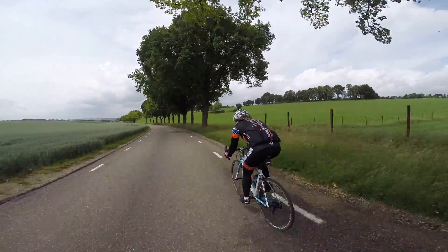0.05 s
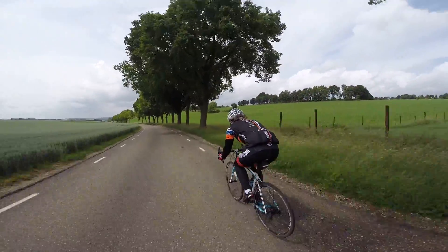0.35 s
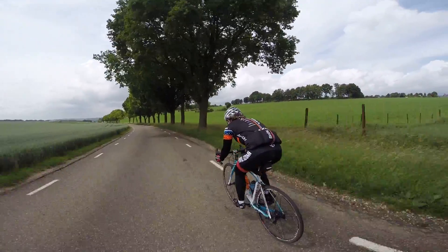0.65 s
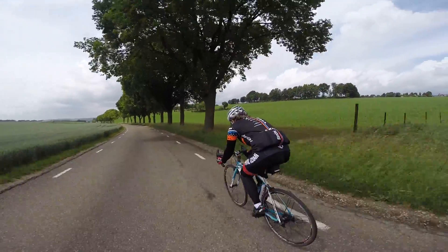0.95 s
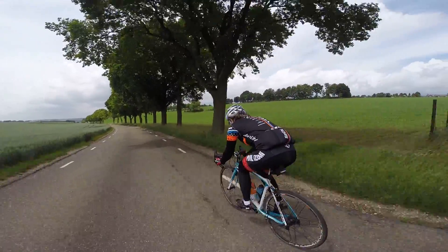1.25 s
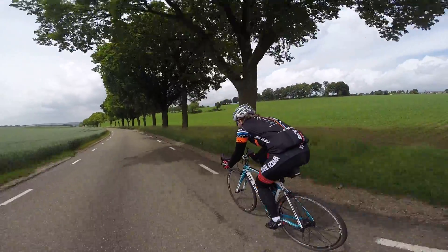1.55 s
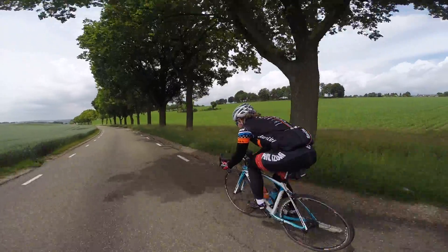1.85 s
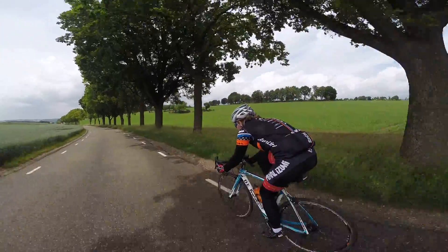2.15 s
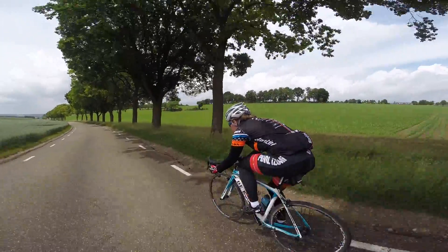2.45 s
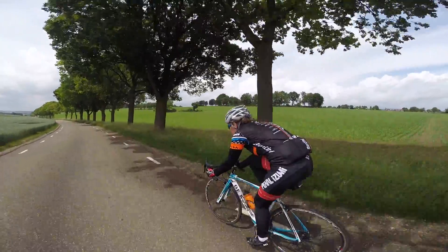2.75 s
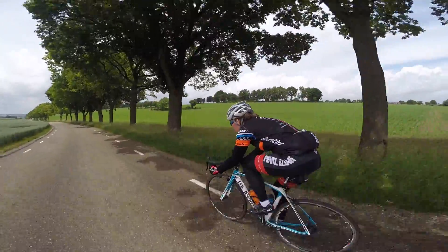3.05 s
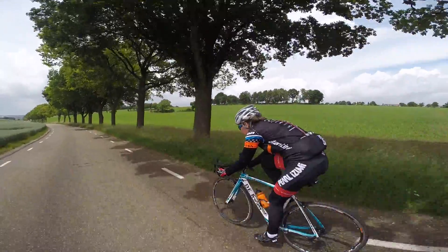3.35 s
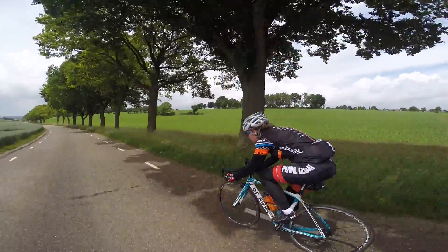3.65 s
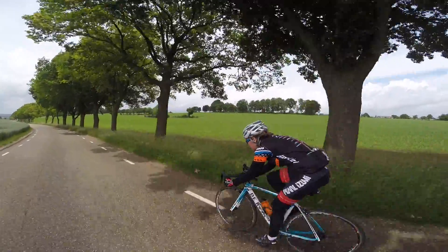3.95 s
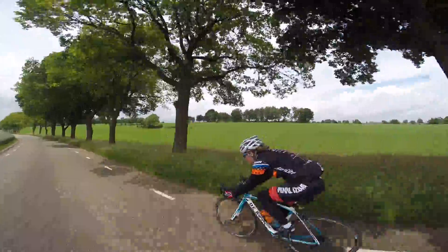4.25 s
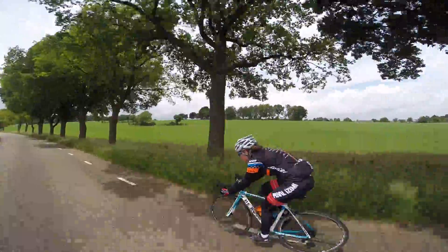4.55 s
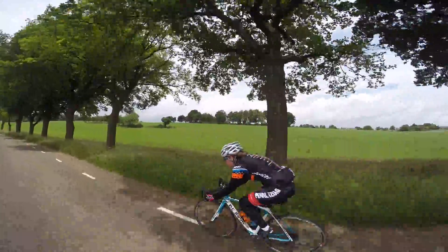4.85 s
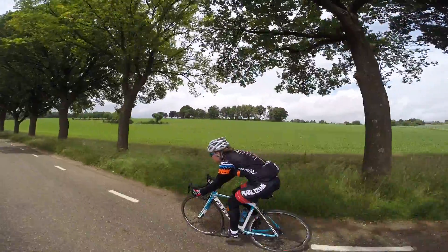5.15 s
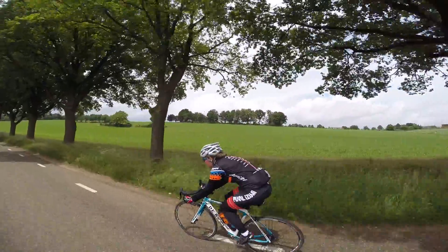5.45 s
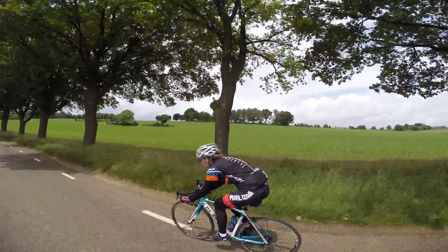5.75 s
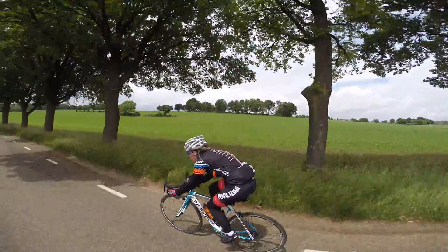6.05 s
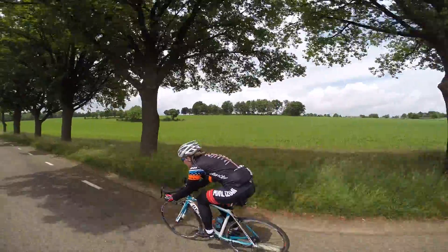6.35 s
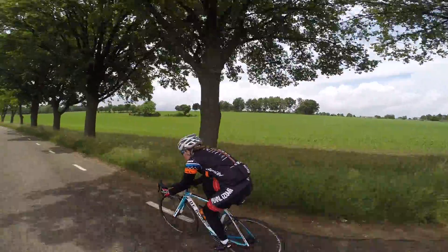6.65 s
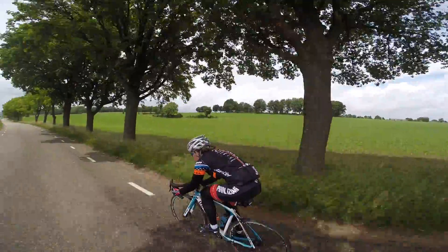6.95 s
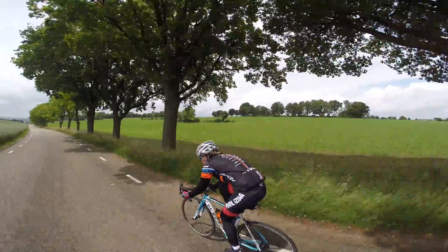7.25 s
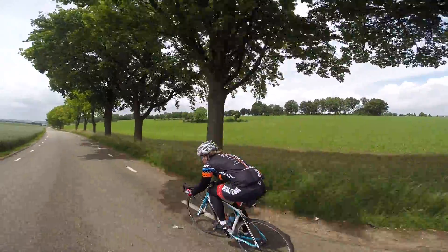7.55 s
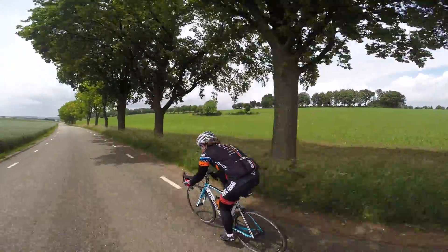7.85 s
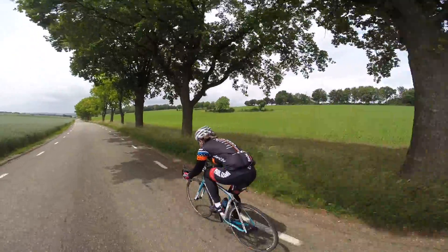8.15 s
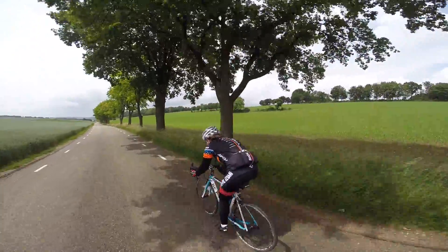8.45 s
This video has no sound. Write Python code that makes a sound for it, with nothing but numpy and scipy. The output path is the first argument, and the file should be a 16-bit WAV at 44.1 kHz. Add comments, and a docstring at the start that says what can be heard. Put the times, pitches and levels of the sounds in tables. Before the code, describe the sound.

Steady rumbling, gusting wind on a moving microphone, mixed with the hiss of bicycle tyres rolling along a country road.

```python
"""Wind buffets and rumbles on the microphone of a camera riding beside a cyclist on a country road.
Eddies break on the port and push on the diaphragm; air rushes over the housing, rings its cavities
and nearly whistles in a gap. Tyres roar and fizz on the asphalt and flick grit, a few bumps knock
the mount, and the electronics whine faintly."""
import sys
import numpy as np
from scipy import signal
from scipy.fft import rfft, irfft, next_fast_len
from scipy.io import wavfile
from scipy.ndimage import uniform_filter1d

SR = 44100
rng = np.random.default_rng(int(sys.argv[2]) if len(sys.argv) > 2 else 0)


def generate_wav(signal):
    """Clip the signal to [-1, 1] and save it as 16-bit WAV at the path in sys.argv[1]."""
    frames = np.transpose(np.atleast_2d(signal))
    scaled = np.clip(frames, -1, 1) * 32767
    pcm = np.round(scaled).astype(np.int16)
    wavfile.write(sys.argv[1], SR, pcm)


N = 379701

# airstream strength: time_s, level_db
AIRSTREAM = [(0, -38), (.12, -35), (.33, -39), (.62, -34.5), (.77, -32), (.88, -41), (.97, -37),
             (2.15, -37), (2.6, -43), (2.655, -45.5), (2.685, -38.5), (3.15, -41.5), (5.27, -40),
             (5.73, -36), (6.3, -42.5), (6.55, -36.5), (7.15, -38.5), (7.5, -36.5), (8.5, -38), (8.61, -33)]
# wind swinging from ahead to the microphone's side: time_s, side_share
SIDE_WIND = [(0, 0.1), (1.85, 0.18), (2.3, 0.22), (3.5, 0.35), (4.4, 0.73), (6.3, 0.67), (7.5, 0.76),
             (8.61, .8)]


def airstream_db(base_db, follow, side_db):
    """Strength and angle of the airstream set a layer's level; follow is in dB per dB."""
    cruise_db = -38
    excess_db = curve(AIRSTREAM, 1) - cruise_db
    return base_db + follow * excess_db + side_db * curve(SIDE_WIND, 1)


# buffet spectrum: freq_hz, relative_db
BUFFET_SPECTRUM = [(25, -5.5), (60, 0.5), (100, -0.5), (170, -4.5), (235, -11.5), (310, -17), (480, -26),
                   (900, -45.5), (3000, -71)]
# wind straight into the port: peak_s, length_s, lift_db
THUMPS = [(.15, 0.12, 3.5), (.71, 0.26, 3.5), (1.75, 0.15, 2.5), (2.19, 0.56, 6), (3.09, 0.1, 3),
          (3.99, .3, -0.3), (4.44, 0.19, 2.5), (5.17, 0.12, 3.5), (5.39, 0.12, 4), (5.72, .4, 0.8),
          (6.56, 0.37, 5), (6.92, 0.16, 4), (7.45, 0.99, 3.5), (7.95, 0.18, 2.5)]
# spectral tilt from the wind angle: time_s, buffet_db_per_octave, rush_db_per_octave
WIND_TILT = [(0, -2.9, -1.8), (.75, 1, 0.2), (1.5, -1, -.5), (2.5, -0.8, -0.8), (3.2, -0.4, -2),
             (4.15, -1.8, -1.7), (4.5, -0.8, 1.2), (5.2, -1.7, -3), (5.7, 0.1, 1.1), (6.2, -1.4, -1),
             (6.55, 0.1, 1.2), (7.1, .1, 0), (7.9, 1.2, -1.5), (8.61, 0.4, -0.2)]


def buffet(flutter):
    """Small eddies break on the microphone port in quick lumps."""
    lumps = sustained(noise(lambda hz: spectrum_db(BUFFET_SPECTRUM, hz)), span_s=0.18)
    level_db = airstream_db(base_db=-35.5, follow=0.31, side_db=7.17) + swells_db(THUMPS)
    tilt = curve(WIND_TILT, 1)
    flow = stirred(lumps, level_db, pivot_hz=124, brighten=0.018, patchy_db=0.94, db_per_octave=tilt)
    return flow * from_db(0.84 * flutter)


# rumble spectrum: freq_hz, relative_db
RUMBLE_SPECTRUM = [(5, -31), (12, -13.5), (22, 6.5), (31, 5.5), (42, -9.5), (58, -7), (110, -22),
                   (400, -106)]
# large eddies and calms: peak_s, length_s, lift_db
EDDIES = [(.25, 0.18, -8), (.75, 0.54, 3), (1.4, .28, 4.8), (2.6, 1.5, 2), (3.03, 0.29, 9), (4.23, 0.22, 5),
          (5.51, 0.18, 9.5), (7.87, 0.25, 1)]


def rumble():
    """Large eddies push slowly on the diaphragm."""
    push = sustained(noise(lambda hz: spectrum_db(RUMBLE_SPECTRUM, hz)), span_s=0.28)
    level_db = airstream_db(base_db=-29.5, follow=0.074, side_db=-4.5) + swells_db(EDDIES)
    return push * from_db(level_db + 0.8 * wander(rate_hz=11))


# rush spectrum: freq_hz, relative_db
RUSH_SPECTRUM = [(700, -21.5), (1900, -13.5), (2150, -6), (2350, -1), (2750, -2), (3020, -11),
                 (3400, -12.5), (4300, -22), (5600, -22), (6400, -27), (9000, -51), (14000, -66)]
# housing cavities: centre_hz, width_hz, lift_db
CAVITIES = [(2270, 180, 1.5), (2640, 440, 1), (3190, 380, 4), (5280, 430, 6.5), (5806, 340, 8.5)]
# short gusts and lulls: peak_s, length_s, lift_db
GUSTS = [(.41, 0.089, 3), (1.2, 0.093, -3.5), (1.29, .14, 1), (1.68, .32, 2.5), (1.82, 0.13, -2.8),
         (1.9, .14, 4), (3.07, 0.089, 1.3), (3.5, 0.095, 2), (2.53, 0.29, -2.8), (5.25, 0.17, -2.5),
         (5.33, 0.12, 0.5), (5.48, .08, 1.5), (7.77, 0.093, 1.2), (8.19, 0.094, 5.5), (8.36, 0.11, -2)]


def rush(flutter):
    """Air shears over the housing and rings its cavities."""
    def housing_db(hz):
        cavities_db = sum(db * resonance(hz, centre_hz, width_hz) for centre_hz, width_hz, db in CAVITIES)
        return spectrum_db(RUSH_SPECTRUM, hz) + cavities_db
    air = noise(housing_db)
    level_db = airstream_db(base_db=-38, follow=0.87, side_db=-0.9) + swells_db(GUSTS)
    tilt = curve(WIND_TILT, 2)
    flow = stirred(air, level_db, pivot_hz=2520, brighten=0.11, patchy_db=0.36, db_per_octave=tilt)
    return flow * from_db(1.06 * flutter)


# air catching the gap squarely: peak_s, length_s, lift_db
WHISTLE_FLARES = [(1.83, .5, 5), (6.45, 0.16, 10), (7.8, 0.29, 7), (8.19, 0.31, 6.5)]


def gap_whistle(flutter):
    """Turbulence feeds the narrow resonance of a housing gap: a fuzzy tone that comes and goes."""
    tone = noise(lambda hz: 20 * np.log10(resonance(hz, centre_hz=3170, width_hz=80)))
    level_db = airstream_db(base_db=-50.5, follow=0.82, side_db=-0.3) + swells_db(WHISTLE_FLARES)
    return tone * from_db(level_db + 0.8 * flutter + 0.61 * wander(rate_hz=7))


# tread spectrum: freq_hz, relative_db
ROAR_SPECTRUM = [(120, 2.5), (450, -4), (700, -4.5), (790, -9), (920, -9), (1100, -3.5), (1380, -0.5),
                 (1570, 3), (1780, -2.5), (2050, -6), (2800, -16.5), (4500, -21.5), (9000, -54)]
# asphalt coarseness: time_s, lift_db
COARSENESS = [(0, -0.5), (1.5, -.2), (2.2, 2.7), (2.55, 1), (3.4, 0.8), (4.7, .2), (5.15, -2.3), (5.8, 0.2),
              (6.3, -0.8), (7.9, 2.9), (8.61, 1)]


def tyre_roar(flutter):
    """Tread drums on coarse asphalt; the sound wavers in the moving air."""
    tread = noise(lambda hz: spectrum_db(ROAR_SPECTRUM, hz))
    level_db = airstream_db(base_db=-45.5, follow=0.66, side_db=2.5)
    level_db += curve(COARSENESS, 1) + 0.3 * swells_db(GUSTS)
    roar = stirred(tread, level_db, pivot_hz=1300, brighten=0.4, patchy_db=1.02)
    return roar * from_db(0.41 * flutter)


# fizz spectrum: freq_hz, relative_db
FIZZ_SPECTRUM = [(2500, -9.5), (5000, -7.5), (6300, -5.5), (6750, 0), (7500, -1), (7950, -7), (8450, -6),
                 (8900, -12), (9600, -10.5), (10500, -17.5), (11400, -23), (13300, -21), (14500, -47)]
# gritty asphalt: peak_s, length_s, lift_db
GRIT_PATCHES = [(.96, .12, 4.5), (1.27, .12, 5), (1.69, .18, 4.5), (1.94, 0.1, 4.5), (2.3, 0.36, 0),
                (2.74, .2, 6), (2.88, 0.25, 6.5), (3.35, 0.43, 5), (3.62, 0.25, 7), (4.08, 0.56, 3),
                (7.64, 0.87, 2.5)]


def tyre_fizz(flutter):
    """Fine grit and air squeezed from the tread hiss with a slight grain."""
    hiss = noise(lambda hz: spectrum_db(FIZZ_SPECTRUM, hz))
    level_db = airstream_db(base_db=-58.5, follow=0.72, side_db=-0.3)
    level_db += curve(COARSENESS, 1) + swells_db(GRIT_PATCHES) + 0.5 * swells_db(GUSTS)
    grain_db = 1.6 * wander(rate_hz=300) + 1.12 * flutter
    return stirred(hiss, level_db, pivot_hz=7500, brighten=0.12, patchy_db=1.0) * from_db(grain_db)


# road bumps: start_s, level_db, time_constant_s
BUMPS = [(2.172, -24, 0.0029), (3.877, -21, 0.00086), (3.974, -18.5, 0.00047)]


def mount_knocks():
    """Bumps knock the mount: dull pressure pulses with no ring."""
    out, t = np.zeros(N), np.arange(SR // 20) / SR
    for start_s, level_db, time_constant_s in BUMPS:
        age = t / time_constant_s
        pulse = age * np.exp(1 - age) * (1 - age / 6)
        add(out, start_s, from_db(level_db) * pulse)
    return out


# flicked grit: start_s, peak_db
GRIT_FLICKS = [(2.781, -57), (2.925, -45)]


def grit_ticks():
    """A tyre flicks grit: tiny bright ticks."""
    out, t = np.zeros(N), np.arange(SR // 20) / SR
    band_hz, decay_s = [6000, 13000], 0.002
    treble = signal.butter(2, band_hz, "bandpass", fs=SR, output="sos")
    for start_s, peak_db in GRIT_FLICKS:
        burst = rng.standard_normal(len(t)) * np.exp(-t / decay_s)
        tick = signal.sosfilt(treble, burst)
        add(out, start_s, from_db(peak_db) * tick / np.abs(tick).max())
    return out


# electronic whine: pitch_hz, level_db, waver_hz
WHINE = [(8781, -79.5, 1), (11705, -82, 16), (14625, -88, 1)]


def electronics():
    """The circuits add thin high tones over an even hiss."""
    tones, hiss_db = np.zeros(N), -68.5
    for pitch_hz, level_db, waver_hz in WHINE:
        hz = pitch_hz + waver_hz * wander(rate_hz=12.2)
        tones += from_db(level_db) * unit_rms(np.sin(2 * np.pi * np.cumsum(hz) / SR))
    return tones + from_db(hiss_db) * rng.standard_normal(N)


def stirred(x, level_db, pivot_hz, brighten, patchy_db, db_per_octave=0):
    """Stronger flow is louder and brighter (brighten: dB/octave per dB); eddies flicker in patches."""
    framing = dict(fs=SR, nperseg=512, noverlap=384)
    hz, frame_s, bins = signal.stft(x, **framing)
    tilt = db_per_octave + brighten * (level_db - np.mean(level_db))
    frame_tilt = np.interp(frame_s, np.arange(N) / SR, tilt)
    octaves = np.clip(np.log2((hz + 1) / pivot_hz), -1, 2)
    patches = rng.standard_normal((len(frame_s), len(hz)))
    patches = uniform_filter1d(patches, size=12, axis=0)
    patches = unit_rms(uniform_filter1d(patches, size=14, axis=1))
    gain_db = np.outer(frame_tilt, octaves) + patchy_db * patches
    _, flow = signal.istft(bins * from_db(gain_db).T, **framing)
    return flow[:N] * from_db(level_db)


def sustained(x, span_s):
    """Evens a flow's strength over the span, leaving its faster lumps."""
    power = signal.fftconvolve(x ** 2, signal.windows.hann(int(span_s * SR)), "same")
    return unit_rms(x / np.sqrt(np.abs(power) + 1e-12))


def swells_db(events):
    """One smooth rise or dip in level per event."""
    total_db = np.zeros(N)
    for peak_s, length_s, lift_db in events:
        start_s = max(peak_s - length_s / 2, 0)
        add(total_db, start_s, lift_db * np.hanning(round(length_s * SR)))
    return total_db


def noise(gain_db):
    """Steady noise of rms 1, shaped by gain_db(hz)."""
    size = next_fast_len(N)
    hz = np.fft.rfftfreq(size, 1 / SR)
    white = rfft(rng.standard_normal(size))
    return unit_rms(irfft(white * from_db(gain_db(hz)), size)[:N])


def wander(rate_hz):
    """Random motion of rms 1, mostly slower than the rate."""
    return noise(lambda hz: -20 * np.log10(1 + (hz / rate_hz) ** 2))


def resonance(hz, centre_hz, width_hz):
    """Resonant peak of height 1."""
    return 1 / (1 + (2 * (hz - centre_hz) / width_hz) ** 2)


def spectrum_db(points, hz):
    """Spectrum points joined on a log-frequency axis."""
    freq_hz, relative_db = np.transpose(points)
    return np.interp(np.log(hz + 1), np.log(freq_hz + 1), relative_db)


def curve(table, column):
    """One column of a time table at every sample."""
    rows = np.array(table)
    return np.interp(np.arange(N) / SR, rows[:, 0], rows[:, column])


def add(mix, start_s, sound):
    """Mixes a sound in at start_s."""
    part = mix[round(start_s * SR):][:len(sound)]
    part += sound[:len(part)]


def from_db(db):
    """Decibels to gain."""
    return 10 ** (np.asarray(db) / 20)


def unit_rms(x):
    """Scales to rms 1."""
    return x / np.sqrt(np.mean(x ** 2) + 1e-20)


def scene():
    """Wind, road and electronics in mono; one turbulent flutter links air and tyres."""
    flutter = wander(rate_hz=17)
    wind = rumble() + buffet(flutter) + rush(flutter) + gap_whistle(flutter)
    road = tyre_roar(flutter) + tyre_fizz(flutter) + mount_knocks() + grit_ticks()
    return (wind + road + electronics())[None]


def record(dry):
    """The camera's band limit."""
    cutoff_hz = 14800
    lowpass = signal.firwin(511, cutoff_hz, window=("kaiser", 9), fs=SR)
    return signal.oaconvolve(dry, lowpass[None], "same")


dry = scene()
out = record(dry)
generate_wav(out)
```